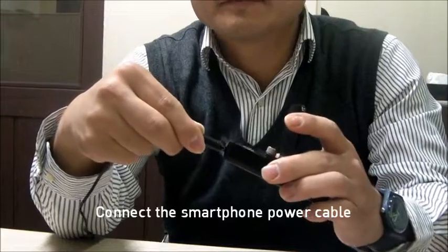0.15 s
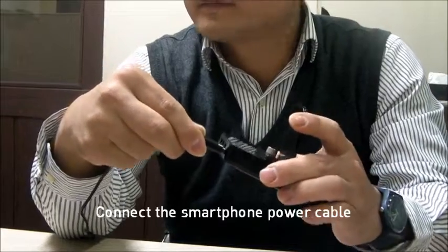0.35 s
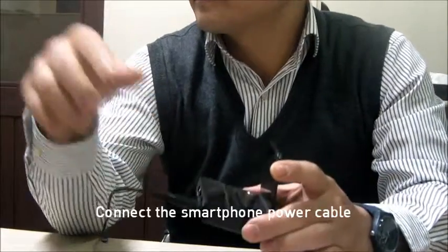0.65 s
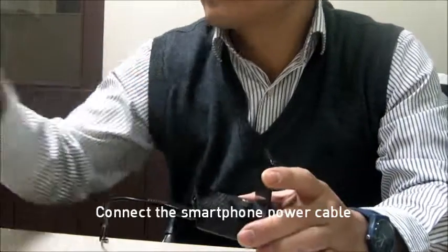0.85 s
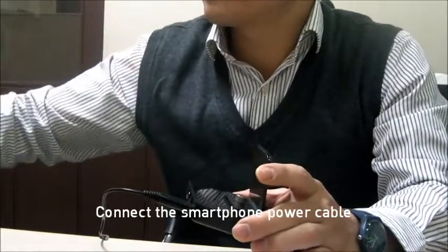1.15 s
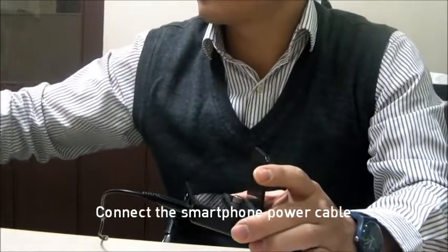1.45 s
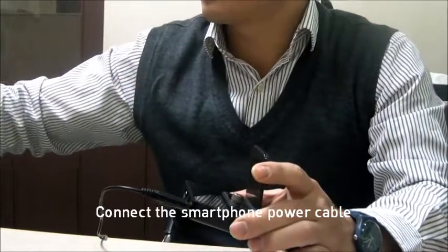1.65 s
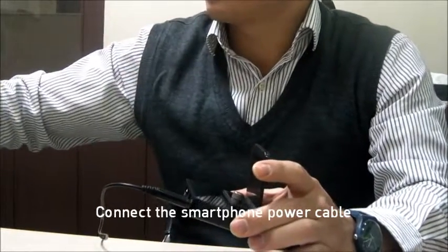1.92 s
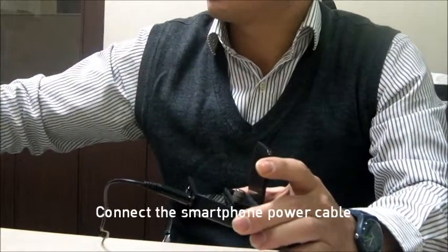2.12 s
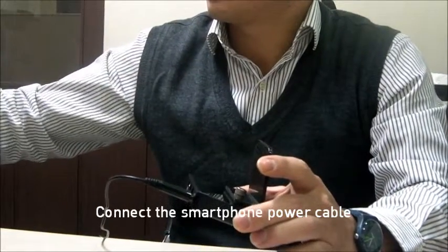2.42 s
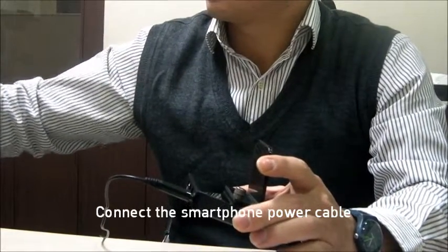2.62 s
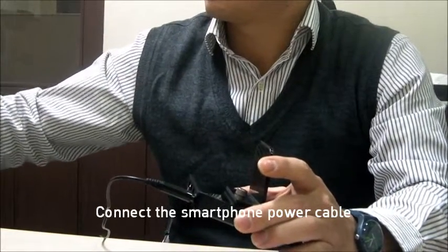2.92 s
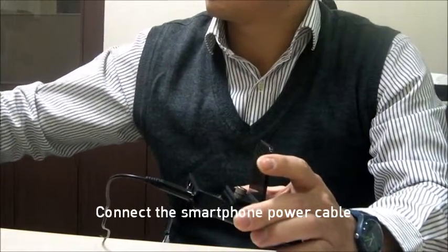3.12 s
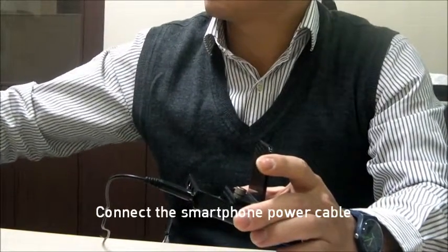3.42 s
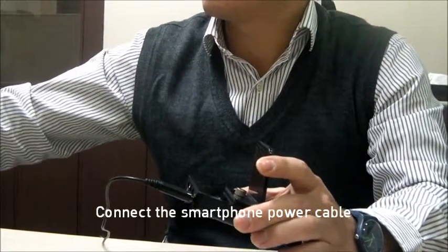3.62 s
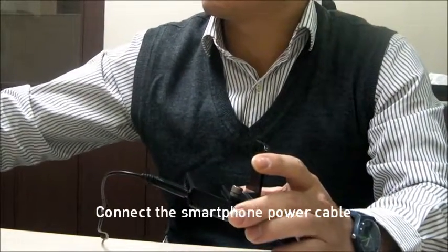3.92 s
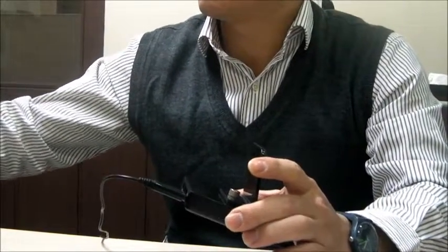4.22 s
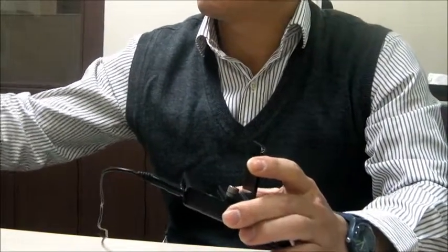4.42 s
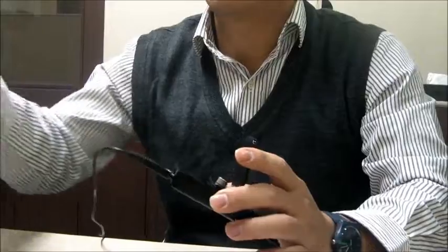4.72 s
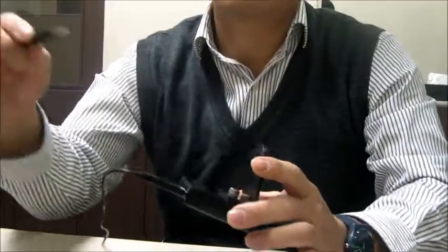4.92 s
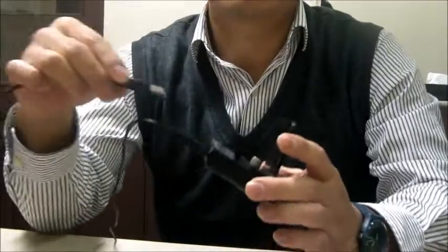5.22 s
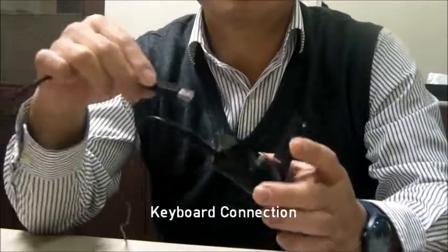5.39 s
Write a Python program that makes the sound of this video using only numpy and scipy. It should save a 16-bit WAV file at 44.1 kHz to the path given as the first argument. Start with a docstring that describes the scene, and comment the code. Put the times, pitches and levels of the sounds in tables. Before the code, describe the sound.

At about 0.2 and 0.3 seconds a plug snaps into a plastic dock with two sharp, close clicks and a soft thump. After a lull with faint rustling, a hollow plastic case starts scraping unevenly across a desk at around 1.3 seconds, with light knocks from 1.9 seconds. The dragging grows louder and peaks between 2.5 and 3.1 seconds, with hard clacks at 2.6 and, loudest, 2.9 seconds, and low thumps from the desktop. Two lighter taps come at 3.3 seconds and another sharp click at 4.2. Softer scrapes and rubbing continue to the end at about 5.5 seconds, with dull desk bumps near 5.3. A cable and a sleeve rustle on and off throughout. The small, hard room adds a short echo, and faint rumble and microphone hiss lie underneath.

```python
"""Plug, dock and plastic case on a desk

A plug snaps into a plastic dock; then a hand drags and knocks a hollow plastic case across the desk.
Knocks and stick-slip grains ring the case's modes, cable and sleeve rustle, and the desk top thumps.
A small hard room answers; room rumble and microphone hiss lie below."""
import sys
import numpy as np
from scipy import signal
from scipy.io import wavfile

SR = 44100
rng = np.random.default_rng(int(sys.argv[2]) if len(sys.argv) > 2 else 0)


def wrap_up_sound(samples):
    """Save the sound to the file named by the first command line argument, as 16-bit audio."""
    columns = np.atleast_2d(samples).T
    # keep every value between -1 and 1, then stretch to whole-number steps
    tamed = np.clip(columns, -1, 1)
    steps = np.round(tamed * 32767).astype(np.int16)
    wavfile.write(sys.argv[1], SR, steps)


N = 244960

# The hollow case's voice in three registers. Each row: pitch in Hz, width in Hz, gain in dB.
CASE_LOW = [(609.6, 180, -9.5), (758, 80, -8.5), (894, 265, -11.5)]
CASE_MID = [(1106, 330, -11.5), (1375, 212, -4), (1506, 185, -5), (1817, 313, -10.5)]
CASE_HIGH = [(2313, 300, -6.5), (2825, 227, -3), (3403, 430, -7.5)]
# Sharp hits. Each row: start in seconds, snap level in dB, snap pitch in Hz, crack level in dB,
# knock into the mid and high modes in dB, knock into the low modes in dB. Each layer has its own trim.
TAPS = [(0.1206, -26.5, 7140, -38, -52, -29.5), (0.1989, -8, 4200, -12, -16, -21),
        (0.3027, -13, 3560, -10.5, -26, -35), (0.6754, -51, 5900, -41, -64, -61),
        (1.9005, -28, 5300, -62, -25, -19.5), (2.0671, -32, 3630, -57, -41, -17),
        (2.0842, -22, 5600, -59, -28, -20.5), (2.342, -19, 4760, -55, -33, -47),
        (2.5074, -30, 5110, -57, -28, -18), (2.5409, -21, 4940, -54, -22, -18),
        (2.603, -6.5, 5400, -15.5, -13, -7.5), (2.6908, -13, 4770, -24.5, -16, -21),
        (2.8644, -11.5, 5500, -47, -27, -29), (2.8721, -19, 5460, -41, -28.5, -22.5),
        (2.915, -1.5, 5820, -11.5, -10.5, -7.5), (3.2659, -24.5, 5370, -37, -38, -39),
        (3.2968, -22, 3330, -35, -28, -37), (4.1879, -9.5, 5650, -25, -23, -37)]


def taps():
    """Each contact is a brief rattle, a pitched snap with a bright crack, plus a knock into the case."""
    snaps, blows = np.zeros(N), np.zeros((2, N))
    t, ring_t = np.arange(400) / SR, np.arange(2600) / SR
    chatters = rng.standard_normal((len(TAPS), len(ring_t))) * np.exp(-ring_t / 0.013)   # after the blow
    rattles = rng.standard_normal((len(TAPS), 2, len(t))) * np.minimum(t / 0.00018, 1)
    push = (t / 0.00005) ** 2 * np.exp(-t / 0.00005)   # a hard contact is a short, rounded push
    for (start, snap_db, hz, crack_db, *knock_db), rattle, chatter in zip(TAPS, rattles, chatters):
        at = round(start * SR)
        snap = resonance(resonance(rattle[0] * np.exp(-t / 0.0026), hz, 1760), hz, 3900)
        crack = resonance(resonance(rattle[1] * np.exp(-t / 0.002), 9100, 4000), 8700, 7400)
        snaps[at:at + len(t)] += from_db(snap_db - 12.5) * rms_one(snap)
        snaps[at:at + len(t)] += from_db(crack_db - 11) * rms_one(crack)
        force = from_db(knock_db)[:, None]
        blows[:, at:at + len(t)] += from_db(30) * force * push
        blows[:, at:at + len(ring_t)] += from_db(15) * force * chatter
    upper, lower = blows
    knocks = body(upper, CASE_MID) + from_db(-9) * body(upper, CASE_HIGH) + body(lower, CASE_LOW)
    return snaps, knocks


# The scrape's ride. Each row: time in seconds, low-mode level in dB, then mid and high modes
# in dB relative to the low ones.
DRAG = [(0.45, -54, -1, 5), (0.61, -39.5, -11, -11), (0.8, -56.5, 1, 5.5), (1.19, -53.5, -2, -1),
        (1.22, -46.5, -6, 9), (1.3, -30.5, -11, -8), (1.46, -52.5, -7, 1.5), (1.51, -27.5, -9, -14),
        (1.54, -31, -8, -14), (1.57, -39.5, 4, -4), (1.64, -39, -13, -7), (1.7, -37.5, -4, -12),
        (1.71, -54, 12, -9.5), (1.74, -35, -15, -24), (1.8, -24, -31, -12), (1.88, -45, -16, -6),
        (1.91, -32.5, 8, -14), (1.97, -36.5, 2.5, -3), (2.08, -23.5, -1, -13), (2.11, -25.5, -5, -18),
        (2.14, -29, -5, -7), (2.17, -24, 0, -7.5), (2.31, -46.5, -1, 4), (2.37, -41.5, 7, 7),
        (2.49, -39, 2.5, 1), (2.51, -28, -5, -5), (2.58, -32, 1, 2), (2.61, -16.5, 3.5, -1.5),
        (2.75, -25.5, -1, -2.5), (2.85, -85.5, 35, 37), (2.91, -21.5, -20, -9), (2.92, -21, 8, 11.5),
        (3.02, -15, -0.5, -0.5), (3.18, -44.5, 6, 8.5), (3.19, -45, -7, -2), (3.22, -41.5, 4.5, 4.5),
        (3.55, -47, 0, -9), (3.62, -34.5, 2.5, -3.5), (3.82, -62, -6, -2), (4.16, -55, -1, -20),
        (4.2, -29.5, -6, 4.5), (4.34, -40, -5, -5), (4.43, -31.5, 2, -13), (4.47, -39, 4, -1),
        (4.53, -42, -6, -8), (4.6, -50.5, 2, -5), (4.97, -39.5, 3, -8), (5.16, -52, 0.5, -9),
        (5.35, -45, 6, -14), (5.55, -35, -10, -4.5)]


def case_drag():
    """Uneven slips excite the case; grip and contact decide which modes answer."""
    level_db, mid_db, high_db = in_time(DRAG)
    slips = grains(2200, spread_db=3.0) * from_db(1.5 * drift(35))
    low, mid, high = (rms_one(body(slips, modes)) for modes in (CASE_LOW, CASE_MID, CASE_HIGH))
    return from_db(level_db - 7) * (low + from_db(mid_db) * mid + from_db(high_db) * high)


# Low weight from the desk. Each row: start in seconds, level in dB before trim, pitch in Hz.
THUMPS = [(0.195, -35, 112), (2.089, -38, 37.7), (2.612, -43, 143), (2.869, -32.5, 150), (2.889, -26, 125),
          (3.288, -33, 134), (5.265, -37, 78), (5.31, -31.5, 42)]


def desk_thumps():
    """The desk top gives a low damped swing."""
    out, t = np.zeros(N), np.arange(SR // 4) / SR
    for start, level_db, hz in THUMPS:
        at = round(start * SR)
        swing = np.sin(2 * np.pi * hz * t) * (1 - np.exp(-t / 0.0034)) * np.exp(-t / 0.024)
        out[at:at + len(t)] += (from_db(level_db + 5) * swing)[:N - at]
    return out


# The desk top's modes. Each row: pitch in Hz, width in Hz, gain in dB.
DESK_MODES = [(180, 64, -3.5), (249, 46, 3.5), (361, 102, -1.5)]
# Forearm and case weighing on the desk. Each row: time in seconds, level in dB.
LEANING = [(0.0, -54), (0.22, -47.5), (0.34, -54.5), (1.07, -51), (1.33, -37), (1.5, -47), (2.22, -42.5),
           (2.43, -75), (2.64, -33), (2.83, -70), (2.87, -35.5), (3.01, -43), (3.17, -53), (3.57, -56),
           (3.62, -46), (3.8, -67), (3.86, -44.5), (4.16, -76), (4.19, -42), (4.67, -64.5), (4.74, -44.5),
           (5.1, -54), (5.39, -42), (5.55, -62)]


def desk_hum():
    """The desk top hums along as forearm and case rub on it."""
    level_db, = in_time(LEANING)
    return from_db(level_db) * rms_one(body(grains(600, spread_db=4.0), DESK_MODES))


# Cable and sleeve, one list per stretch of handling. Each row: time in seconds, level in dB before trim.
RUSTLE = [
    [(0.0, -67), (0.11, -73), (0.124, -34), (0.19, -48.5)],
    [(0.4, -45), (0.458, -51.5), (1.264, -50.5), (1.28, -45.5), (1.458, -57), (1.554, -43.5), (1.732, -56),
     (1.77, -38), (1.862, -57), (1.91, -48), (1.98, -55), (2.022, -40.5), (2.136, -45.5), (2.168, -26.5),
     (2.19, -52), (2.286, -48), (2.33, -44.5)],
    [(2.38, -42.5), (2.494, -44.5), (2.548, -41.5), (2.59, -40)],
    [(3.1, -43.5), (3.26, -62), (3.262, -43.5), (3.42, -43.5), (3.454, -51.5), (3.608, -37), (3.814, -65),
     (4.058, -55), (4.07, -48), (4.142, -64), (4.17, -57)],
    [(4.27, -40), (4.318, -43.5), (4.448, -37.5), (4.49, -51), (4.576, -48.5), (4.8, -39), (4.89, -45),
     (4.926, -37.5), (5.196, -53), (5.268, -50.5), (5.336, -38), (5.542, -53), (5.55, -44)],
]
# The cloth's EQ. Each row: frequency in Hz, gain in dB.
CLOTH_EQ = [(880, -38), (1500, -9.5), (1650, -7), (2250, -6), (3710, -11), (5720, -6.5), (8830, -9),
            (11000, -15.5), (15000, -22)]


def rustle():
    """Fine fibres catch and let go: very dense grains in a bright colour with a scratchy peak."""
    fibres = np.array([grains(9000, spread_db=2.5) for _ in range(2)])
    cloth = rms_one(sum(from_db(at_hz(CLOTH_EQ, hz)) * band for hz, band in bands(fibres) if hz > 1200))
    scratch = rms_one(resonance(grains(1500, spread_db=3.0), 5700, 330))
    level_db, = in_time(np.vstack(RUSTLE))
    flicker_db = 1.2 * drift(25)
    return from_db(level_db - 2 + flicker_db) * (cloth + from_db(-7.5) * scratch)


# The room's decay. Each row: frequency in Hz, seconds to fall by 60 dB.
ROOM_T60 = [(150, 0.49), (600, 0.45), (2000, 0.46), (6000, 0.39), (12000, 0.14)]
# Its tone. Each row: frequency in Hz, gain in dB.
ROOM_EQ = [(100, -6), (500, 9.5), (2000, 0), (6000, 3), (13000, 0.5)]
# Its stereo width. Each row: frequency in Hz, side over mid in dB.
ROOM_WIDTH = [(100, -21.5), (1000, -23.5), (4000, -7), (8000, -1), (12000, 11)]


def room(x):
    """Diffuse echoes as mid and side: noise that builds up after the first walls and dies band by band."""
    t, tail = np.arange(int(0.8 * SR)) / SR, 0
    for hz, (mid, side) in bands(rng.standard_normal((2, 2, len(t)))):
        decay = from_db(at_hz(ROOM_EQ, hz) - 60 * t / at_hz(ROOM_T60, hz))
        tail = tail + decay * np.array([mid, from_db(at_hz(ROOM_WIDTH, hz)) * side])
    tail = tail * np.clip((t - 0.003) / 0.0059, 0, 1)   # 3 ms pre-delay, then a fade-in
    tail = tail / np.sqrt(np.sum(tail[0] ** 2))
    return signal.fftconvolve(x[None], tail, axes=1)[:, :N]


# The noise bed's tone. Each row: frequency in Hz, gain in dB.
BED_EQ = [(15, -37), (25, 0), (64, -5.5), (140, 7.5), (164, -3.5), (253, -12.5), (313, -27.5), (378, -12),
          (495, -10), (3930, -21), (6210, -28), (8580, -25), (15500, -29)]
# Its stereo width. Each row: frequency in Hz, side over mid in dB.
BED_WIDTH = [(100, -19), (2000, -14), (6000, -5), (12000, 0)]


def rumble_and_hiss(level_db=-48):
    """Room rumble and microphone hiss as mid and side; the bass swells together, each band wavers."""
    bed, swell = 0, drift(2.5)
    for hz, (mid, side) in bands(rng.standard_normal((2, 2, N))):
        gain = from_db(at_hz(BED_EQ, hz) + 0.7 * drift(3.4) + 2.0 * swell * (hz < 300))
        bed = bed + gain * np.array([mid, from_db(at_hz(BED_WIDTH, hz)) * side])
    return from_db(level_db) * bed / np.std(bed[0])


def from_db(db):
    return 10 ** (np.asarray(db) / 20)


def rms_one(x):
    return x / np.sqrt(np.mean(x ** 2) + 1e-20)


def in_time(rows):
    """One automation curve for each column after the time."""
    times, *columns = np.transpose(rows)
    return [np.interp(np.arange(N) / SR, times, column) for column in columns]


def at_hz(points, hz):
    freqs, values = np.transpose(points)
    return np.interp(np.log(hz), np.log(freqs), values)


def drift(rate_hz):
    """Slow random wander of spread 1."""
    hop, settle = 40, 2000
    r = np.exp(-2 * np.pi * rate_hz * hop / SR)
    slow = signal.lfilter([1], [1, -2 * r, r * r], rng.standard_normal(N // hop + settle + 2))[settle:]
    return np.interp(np.arange(N) / hop, np.arange(len(slow)), rms_one(slow))


def resonance(x, hz, width_hz):
    """Two-pole band-pass with gain 1 at its peak."""
    r = np.exp(-np.pi * width_hz / SR)
    gain = (1 - r * r) / 2
    return signal.lfilter([gain, 0, -gain], [1, -2 * r * np.cos(2 * np.pi * hz / SR), r * r], x + 1e-18)


def body(x, modes):
    """Parallel resonances with alternating signs; a second, wider pass deepens the valleys."""
    return sum((-1) ** k * from_db(db) * resonance(resonance(x, hz, width), hz, 4.54 * width)
               for k, (hz, width, db) in enumerate(modes))


def bands(noise_pair):
    """Yields centre in Hz and half-octave band; neighbours take unrelated noise."""
    edges_hz = 25 * 2 ** np.arange(0, 9.6, 0.5)
    for k, (low, high) in enumerate(zip(edges_hz, edges_hz[1:])):
        sos = signal.butter(2, [low, high], "band", fs=SR, output="sos")
        yield np.sqrt(low * high), signal.sosfilt(sos, noise_pair[k % 2])


def grains(per_s, spread_db):
    """Stick-slip clicks at random moments with uneven sizes; rms 1."""
    sizes = from_db(spread_db * np.minimum(rng.exponential(1, N), 5)) * rng.choice([-1, 1], N)
    return rms_one(sizes * (rng.random(N) < per_s / SR))


def scene():
    """Close hits over rubbing, echoes and the noise bed, mixed as mid and side, then left and right."""
    snaps, knocks = taps()
    rubbing = case_drag() + desk_hum() + rustle()
    thumps = desk_thumps()
    echoes = room(from_db(-6.5) * snaps + from_db(-5.5) * (knocks + rubbing))
    wide_rubbing = np.array([rubbing, from_db(-22) * np.roll(rubbing, 300)])
    high_cut = signal.cheby2(10, 30, 15300, fs=SR, output="sos")
    mid, side = signal.sosfilt(high_cut, wide_rubbing + echoes + rumble_and_hiss())
    mid = mid + snaps + knocks + thumps
    # Two close microphone ports give the hits a little width.
    side = side - from_db(-12.5) * np.diff(snaps, prepend=0)
    side = side + from_db(-25) * np.roll(knocks + thumps, 150)
    return np.array([from_db(-0.19) * (mid + side), from_db(-0.44) * (mid - side)])


def record(dry):
    """Peaks clip at full scale; a steep low-pass cuts the top."""
    high_cut = signal.cheby2(12, 60, 16450, fs=SR, output="sos")
    return signal.sosfilt(high_cut, np.clip(dry, -1, 1))


dry = scene()
out = record(dry)
wrap_up_sound(out)
```